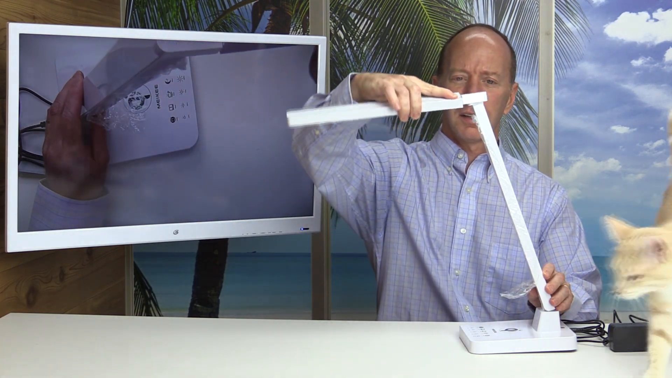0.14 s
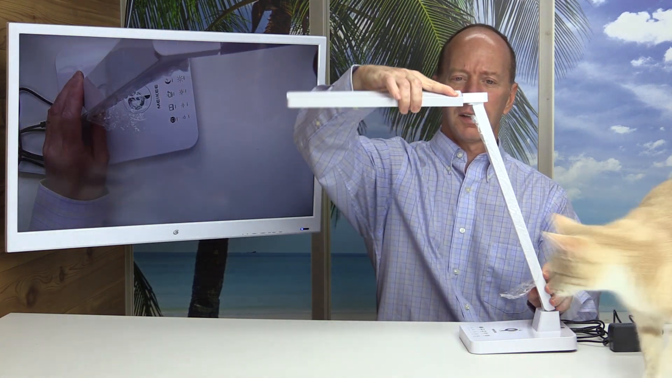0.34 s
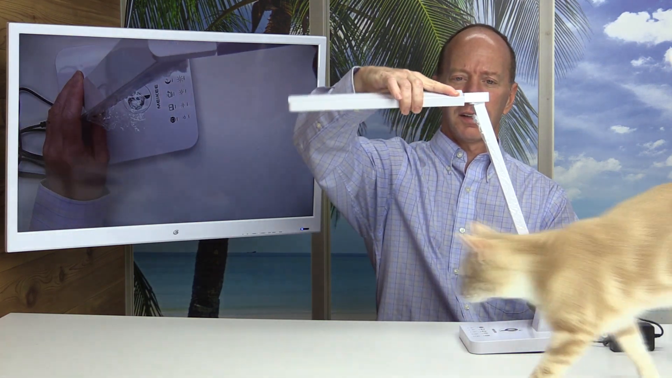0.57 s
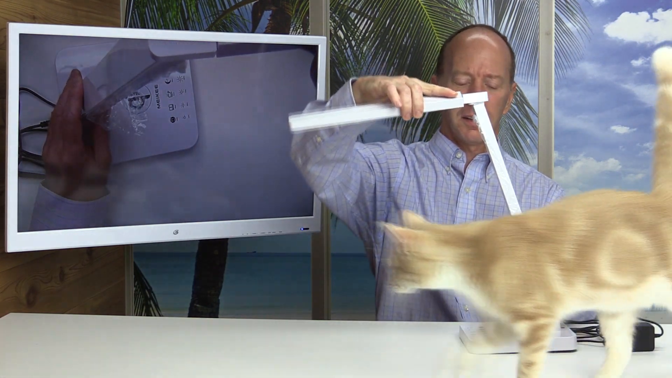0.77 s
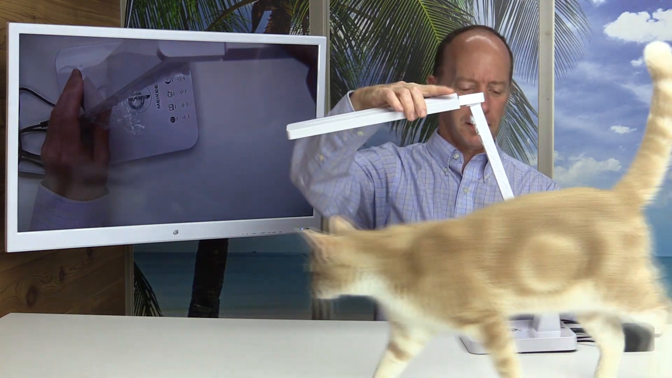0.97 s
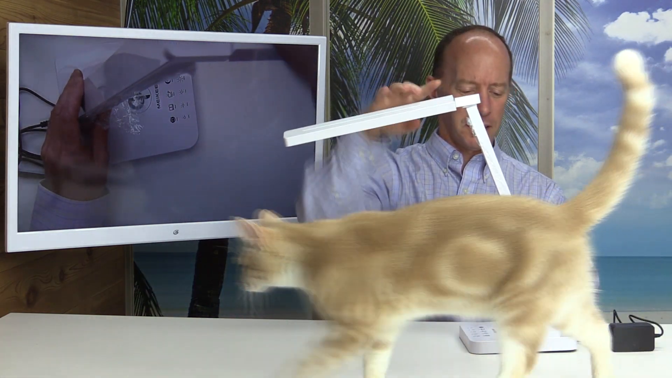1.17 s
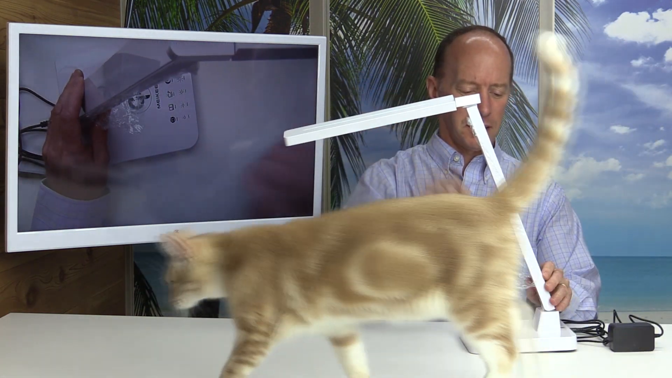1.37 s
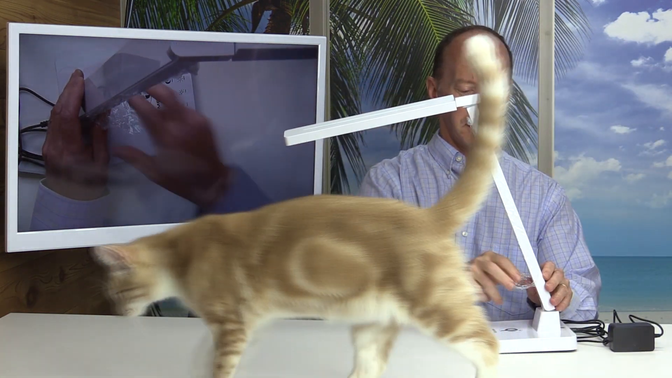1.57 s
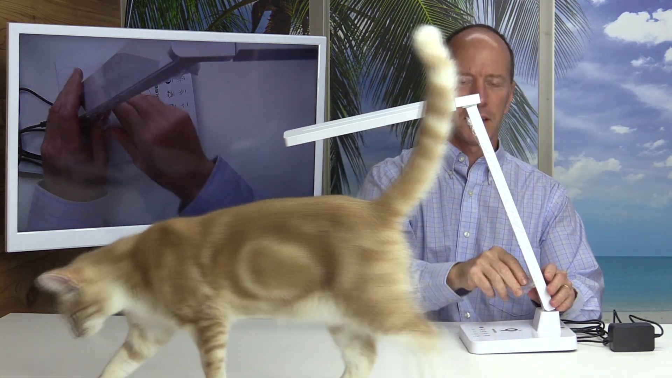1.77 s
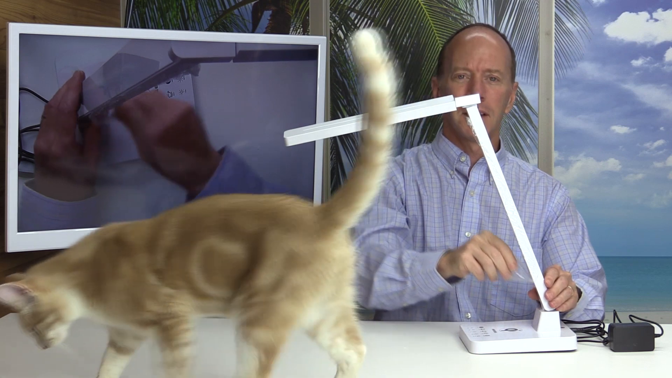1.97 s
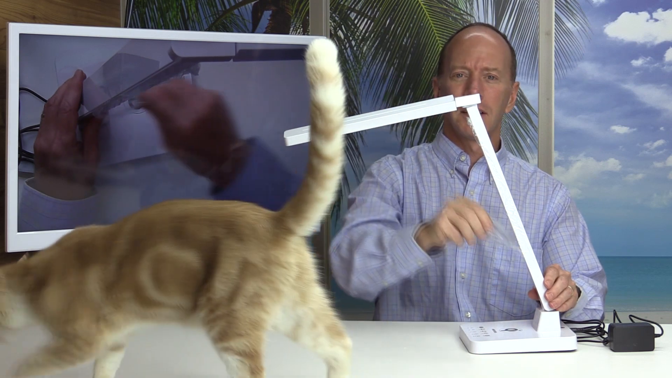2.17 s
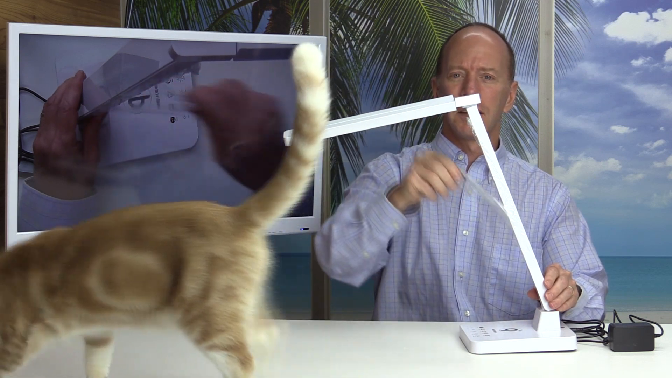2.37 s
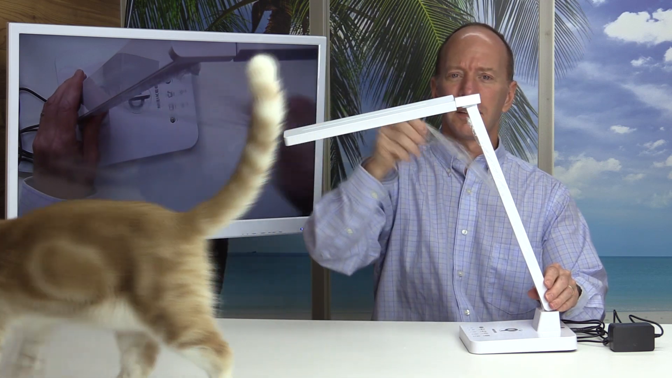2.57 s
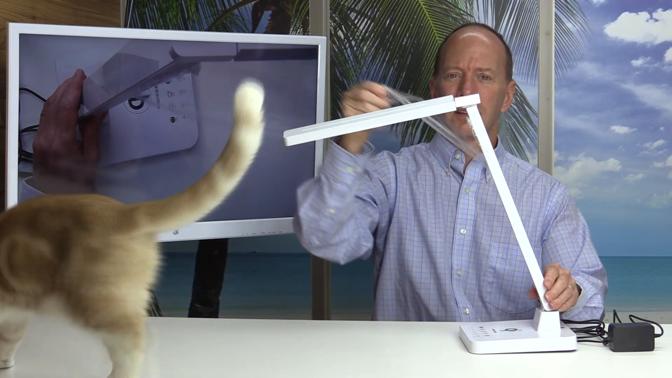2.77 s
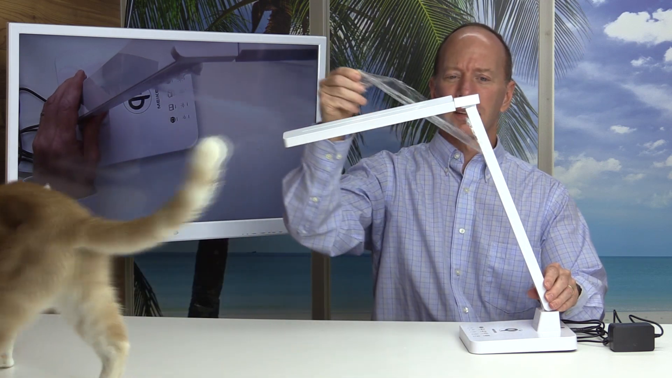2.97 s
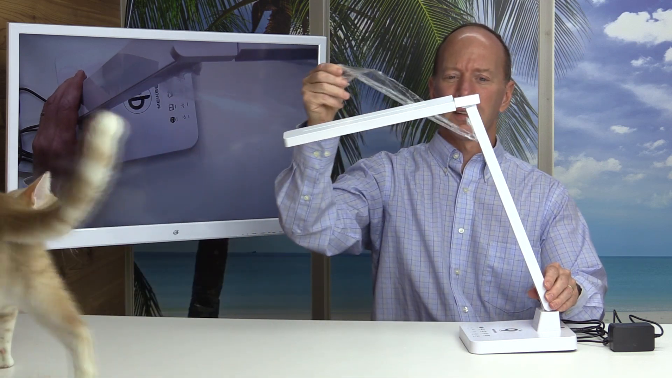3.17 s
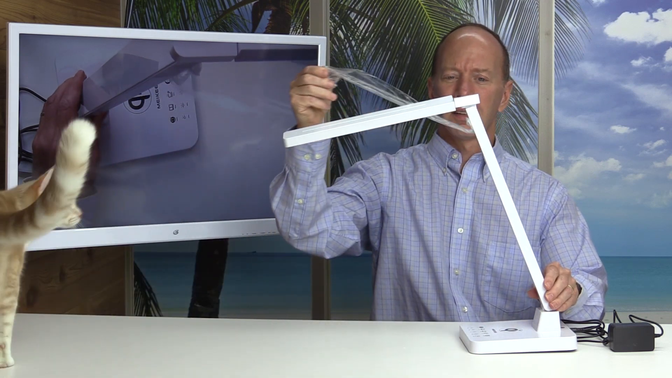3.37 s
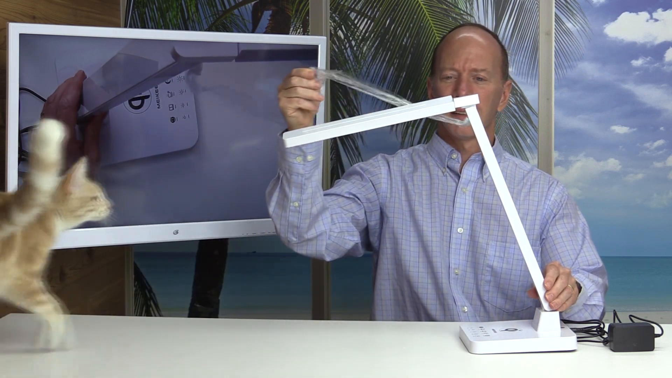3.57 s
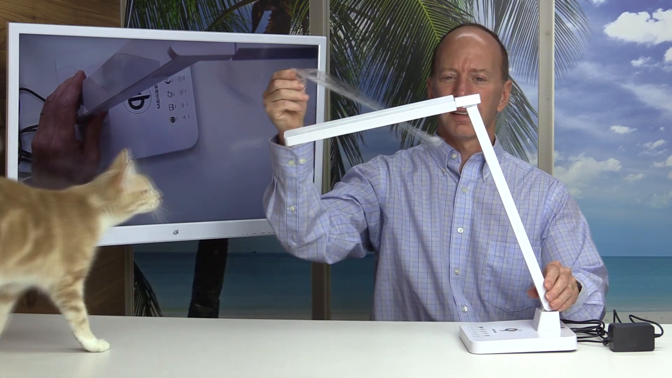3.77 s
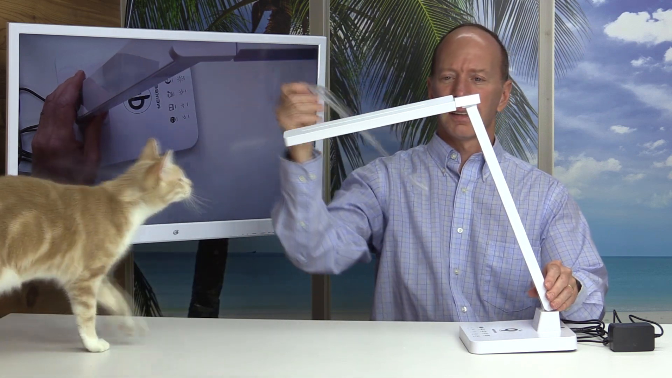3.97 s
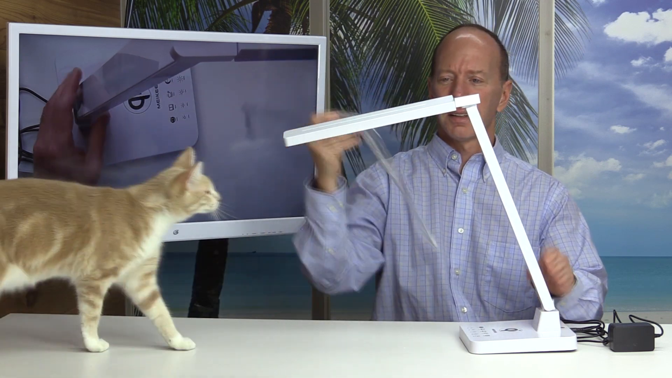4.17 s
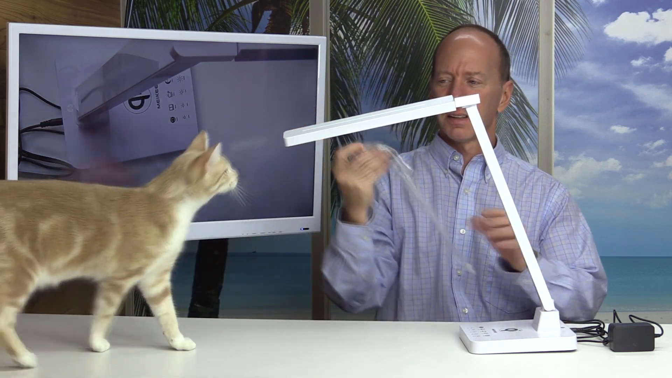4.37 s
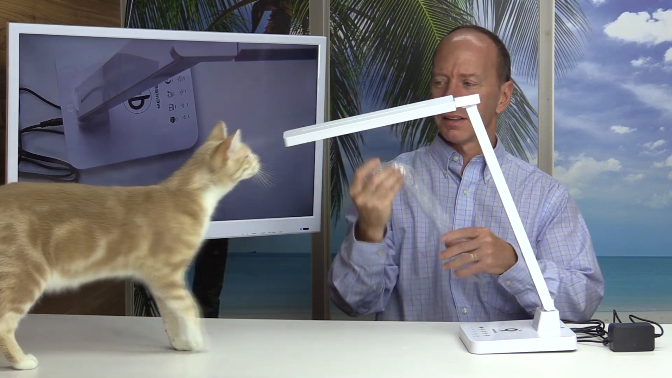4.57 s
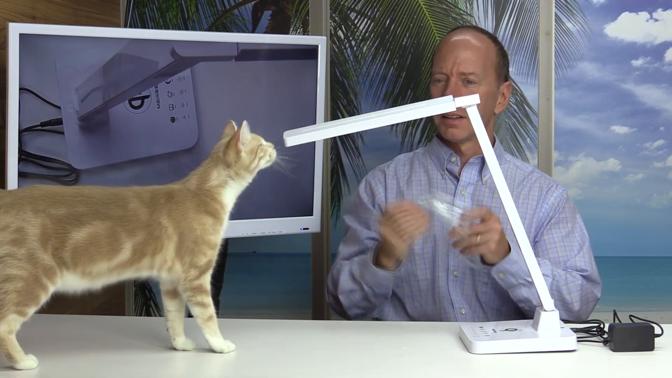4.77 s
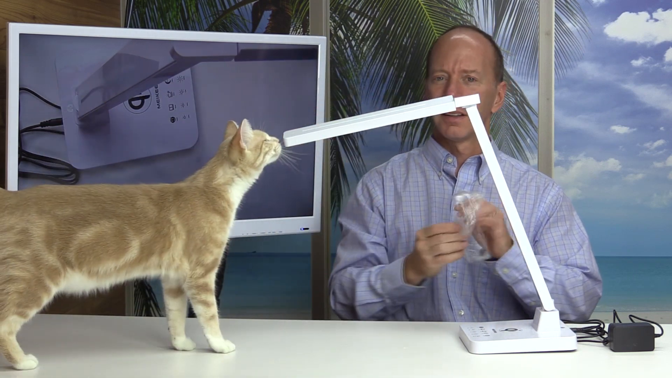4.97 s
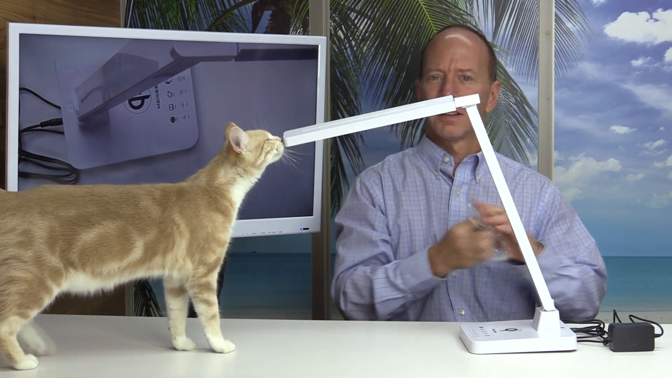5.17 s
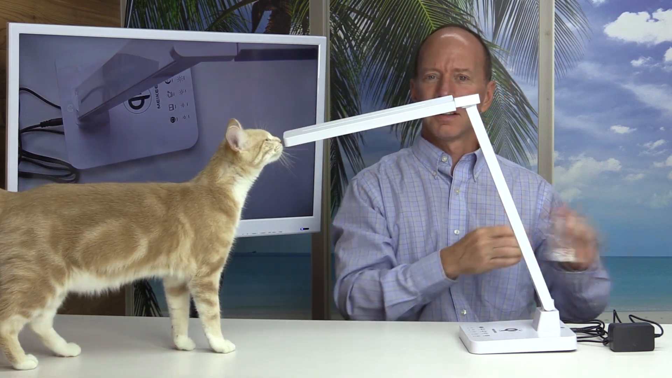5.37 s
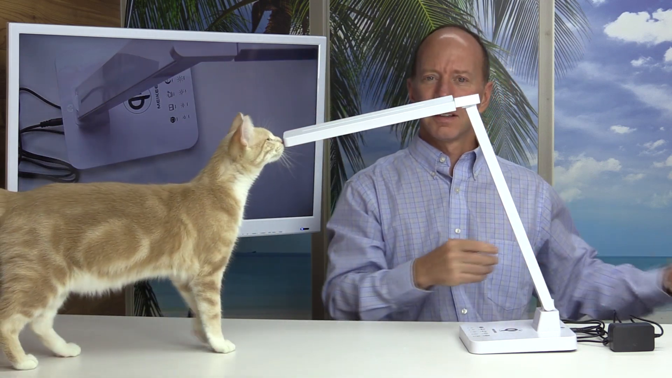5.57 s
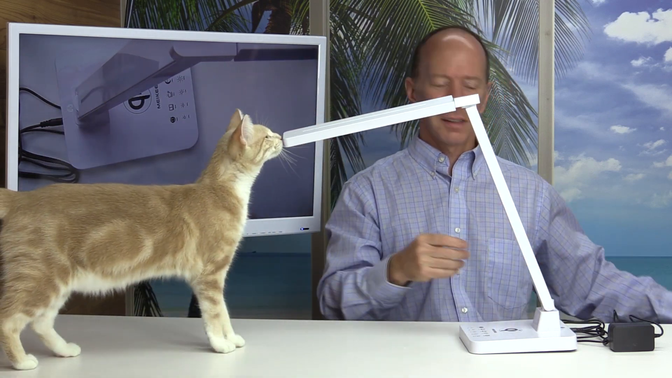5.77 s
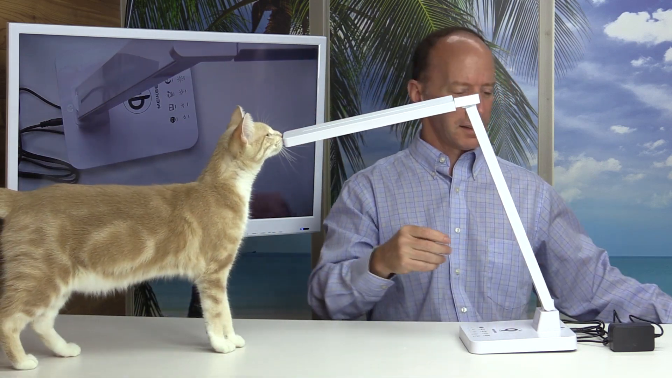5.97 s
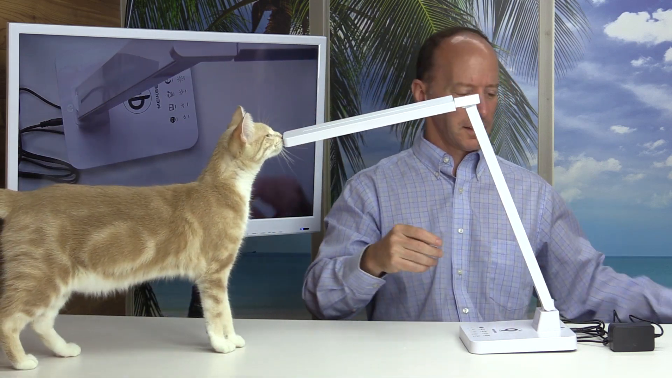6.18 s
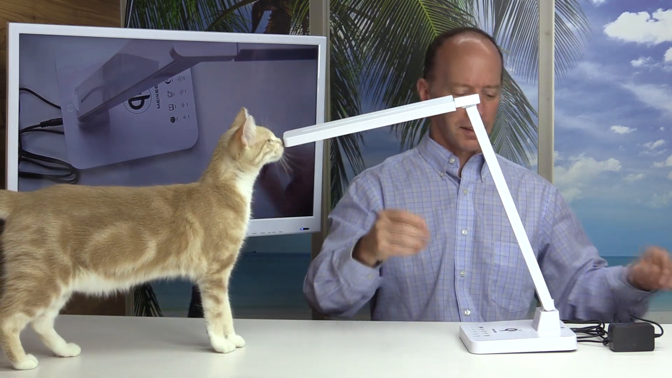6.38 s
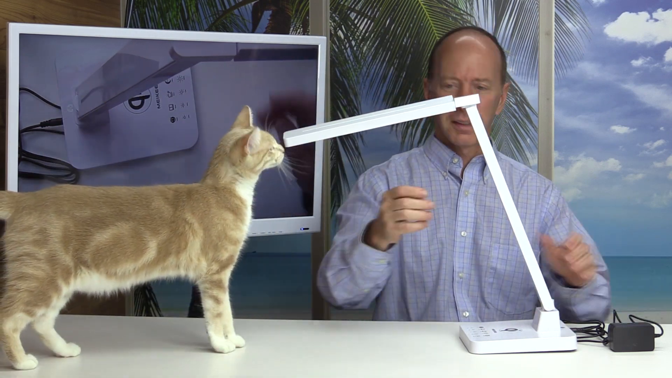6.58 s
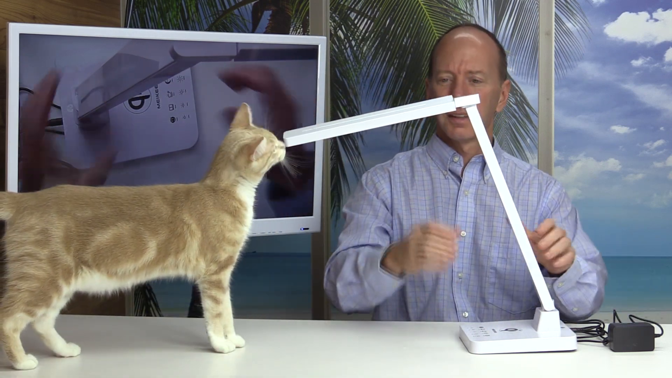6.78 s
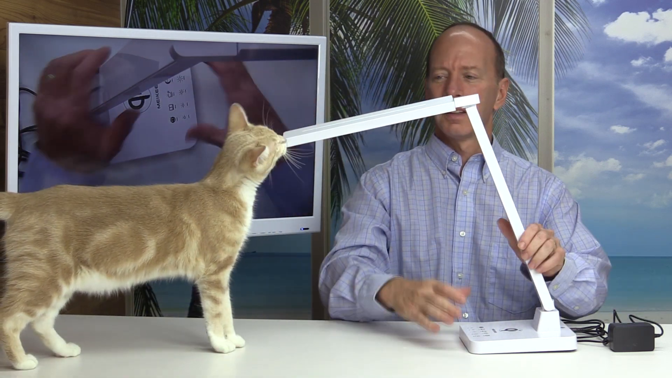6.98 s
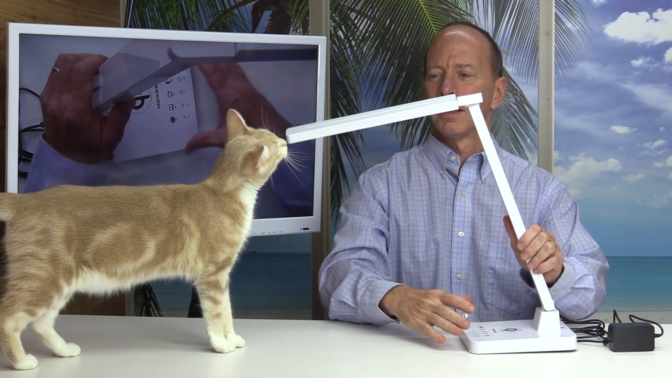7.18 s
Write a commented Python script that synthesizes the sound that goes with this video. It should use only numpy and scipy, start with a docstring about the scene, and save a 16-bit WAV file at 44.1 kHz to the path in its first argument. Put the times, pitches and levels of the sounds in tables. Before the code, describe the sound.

Protective film is pulled off a lamp on a desk. Sparse light clicks and faint squeaks come first, then a forceful crackling tear with drumming flutter and low thumps from the swaying stand. After a quieter stretch of loose crinkling, the film is crumpled in crisp bursts, fading to a dull tap and scattered ticks. Close, nearly centred sound, short room reflections, faint hum.

```python
"""Thin plastic film is peeled off a desk lamp, torn free, crumpled and laid aside in a small room.
Over faint hum and hiss: weak snaps, two hinge squeaks (shaken tones) and a soft knock (damped modes).
From 2 s the pull: sharp snaps (short pings) over dense crackle (thousands of tiny pings), the sheet
flutters (shaped noise), the desk rumbles and the stand sways. The film comes off near 3.75 s, is crumpled
to about 6 s and laid aside with a second knock and last snaps. Both channels are nearly the same."""
import sys
import numpy as np
from scipy import signal
from scipy.fft import rfft, irfft, next_fast_len
from scipy.io import wavfile
from scipy.ndimage import uniform_filter1d, map_coordinates

SR = 44100
rng = np.random.default_rng(int(sys.argv[2]) if len(sys.argv) > 2 else 0)


def unload_audio(sound):
    """Save the sound as a 16-bit wav file, at the path given as the first command line argument."""
    columns = np.transpose(np.atleast_2d(sound))
    # keep every value between -1 and 1, then stretch to whole-number steps
    steps = np.round(np.clip(columns, -1, 1) * 32767)
    wavfile.write(sys.argv[1], SR, steps.astype(np.int16))


N = 319284

# handling of the film: (time [s], crackle level [dB], treble gain, limited to -10..9 [dB], flutter level [dB])
HANDLING = [(0.0, -87.5, -20, -71), (0.62, -93, 30, -78), (0.7, -63.5, -17, -72), (1.2, -69.5, -3, -77),
            (1.62, -74.5, -6.5, -78), (1.69, -46.5, -7, -57), (1.77, -52.5, -5.5, -65),
            (1.85, -41.5, -4.5, -55), (1.96, -44, 1.5, -65), (2.04, -38, 0, -48), (2.2, -37, 6.5, -41),
            (2.36, -37, 2.5, -40.5), (2.66, -32.5, -1.5, -42.5), (2.71, -39, -3, -41.5),
            (2.8, -35.5, -2.5, -43), (2.98, -35.5, -5, -46), (3.27, -48, -7.5, -66.5),
            (3.53, -40, -0.5, -55), (3.76, -57, -38, -69), (3.97, -62, -0.5, -73), (4.32, -56, -3.5, -67),
            (4.64, -57.5, -6, -65), (4.76, -49.5, -2.5, -52.5), (4.98, -40, 0, -54), (5.04, -46.5, -9, -61),
            (5.1, -40.5, -3.5, -50.5), (5.4, -34, -6, -56), (5.56, -51.5, 7.5, -67), (5.68, -38.5, -5, -71),
            (6.0, -51, 0, -58.5), (6.18, -54.5, -6, -65), (6.24, -49.5, -3.5, -61), (6.31, -76, -6, -82),
            (6.43, -57, -1, -63.5), (6.98, -68.5, -3.5, -73), (7.06, -72.5, -2, -75),
            (7.24, -64.5, -35.5, -69)]
# short rips, many creases at once: (time [s], crackle level [dB], flutter level [dB], 60 dB decay [s])
RIP_EVENTS = [(1.656, -52, -48, 0.031), (1.808, -63, -43, 0.04), (1.996, -26, -51, 0.11),
              (2.151, -44, -58, 0.1), (2.773, -70.5, -40, 0.28), (2.905, -19.5, -50, 0.011),
              (3.123, -30.5, -44.5, 0.31), (3.654, -22.5, -37.5, 0.071), (4.329, -36.5, -75, 0.08),
              (4.655, -47, -81, 0.32), (4.722, -30.5, -44.5, 0.14), (4.789, -35, -48, 0.15),
              (4.989, -35, -41.5, 0.11), (5.068, -30.5, -52, 0.13), (5.205, -33.5, -45, 0.12),
              (5.269, -33, -52, 0.09), (5.387, -27.5, -46, 0.078), (5.677, -42, -48, 0.21),
              (6.205, -53, -67.5, 0.32), (6.359, -52, -82, 0.1), (6.421, -46, -71, 0.064),
              (6.617, -53, -78, 0.074), (7.045, -51.5, -84, 0.29)]


def amp(db):
    """Gain of a level in dB."""
    return 10 ** (np.asarray(db) / 20)


def unit(x):
    """x at rms 1."""
    return x / np.sqrt(np.mean(x ** 2) + 1e-20)


def along(points, hz):
    """(Hz, value) points interpolated on a log frequency axis."""
    point_hz, value = np.transpose(points)
    return np.interp(np.log(hz + 1), np.log(point_hz + 1), value)


def curves(rows):
    """One value per sample for each column after the time."""
    time_s, *columns = np.transpose(rows)
    return [np.interp(np.arange(N) / SR, time_s, column) for column in columns]


def wobble(rate_hz):
    """Smooth random curve with rate_hz knots a second."""
    knots = rng.standard_normal(int(N * rate_hz / SR) + 4)
    return map_coordinates(knots, [np.arange(N) * rate_hz / SR])


def filtered(x, response):
    """x times a response of frequency, zero-padded against wrap-around."""
    size = next_fast_len(N + SR // 2)
    return irfft(rfft(x, size) * response(np.fft.rfftfreq(size, 1 / SR)), size)[..., :N]


def coloured(x, spectrum, lo_hz, hi_hz):
    """x given a spectrum, at rms 1 inside the band lo-hi."""
    y = filtered(x, lambda hz: amp(along(spectrum, hz)))
    return y / np.std(filtered(y, lambda hz: (hz > lo_hz) & (hz < hi_hz)))


def pings(time_s, hz, gain, cycles, size):
    """Critically damped sines: the envelope peaks after the given cycles, then decays."""
    turns = np.arange(size) * hz[:, None] / SR
    envelope = turns / cycles * np.exp(1 - turns / cycles)
    shape = gain[:, None] * np.sin(2 * np.pi * turns) * envelope
    at = np.round(time_s * SR).astype(int)[:, None] + np.arange(size)
    return np.bincount(at.ravel(), shape.ravel(), N + size + SR)[:N]


def bursts(time_s, db, t60_s):
    """Envelope of sudden swells: 2 ms rise, 60 dB decay in t60_s."""
    out, t = np.zeros(N + SR), np.arange(SR // 2) / SR
    for start_s, level_db, decay_s in zip(time_s, db, t60_s):
        swell = amp(level_db - 60 * t / decay_s) * (1 - np.exp(-t / 0.002))
        out[round(start_s * SR):][:len(t)] += swell
    return out[:N]


def background():
    """Mains hum with slightly unsteady lines, and the steady hiss of room and amplifier."""
    # hum lines: (frequency [Hz], typical rms level [dB])
    hum_lines = [(59.2, -55), (172.3, -69.5)]
    # hiss spectrum: (frequency [Hz], relative density [dB per Hz])
    hiss_spectrum = [(60, -24), (100, 12.5), (150, -9.5), (185, 7.5), (260, -1.5), (500, -8), (1240, -21.5),
                     (3070, -27.5), (16000, -65.5)]
    hiss_db = -68
    t, hum = np.arange(N) / SR, np.zeros(N)
    for hz, db in hum_lines:
        level = np.sqrt(2) * amp(db + 1.6 * wobble(14))
        hum += level * np.sin(2 * np.pi * hz * t + wobble(4))
    return hum + amp(hiss_db) * coloured(rng.standard_normal(N), hiss_spectrum, 152, 15500)


def desk_rumble():
    """Handling shakes desk and stand: two bands of low noise that follow the pulling."""
    # shaking: (time [s], deep level [dB], upper level [dB])
    shaking = [(0.0, -48, -61), (0.24, -47.5, -67), (1.13, -54, -63.5), (1.95, -53, -74), (2.02, -73, -53),
               (2.52, -55, -48.5), (3.0, -42.5, -43), (3.21, -37, -43.5), (3.25, -50, -56.5),
               (3.63, -36, -48), (3.85, -57.5, -65), (6.11, -62, -69), (7.24, -72, -66.5)]
    # deep spectrum: (frequency [Hz], relative density [dB per Hz])
    deep_spectrum = [(12, -3), (22, 7), (40, 0.5), (60, -13.5), (90, -44)]
    # upper spectrum: (frequency [Hz], relative density [dB per Hz])
    upper_spectrum = [(45, -2.5), (70, 7), (110, -3), (170, -5.5), (260, -62)]
    deep_db, upper_db = curves(shaking)
    deep = amp(deep_db) * coloured(rng.standard_normal(N), deep_spectrum, 18, 50)
    return deep + amp(upper_db) * coloured(rng.standard_normal(N), upper_spectrum, 75, 150)


def stand_sway():
    """Tugs set the lamp stand swaying: heavily damped low swings."""
    # tugs: (time [s], envelope peak [dB], sway frequency [Hz])
    tugs = [(2.798, -31.5, 34), (2.872, -28, 45), (3.061, -33.5, 32), (3.143, -24, 30.3),
            (3.292, -28, 31.7), (3.532, -25.5, 17.9)]
    time_s, tug_db, sway_hz = np.transpose(tugs)
    return pings(time_s, sway_hz, amp(tug_db), cycles=0.89, size=20000)


def desk_knocks():
    """Soft knocks ring the modes of the desk top, with a low thud and a noisy puff."""
    # knocks: (time [s], ring level [dB], thud level [dB], puff level [dB])
    knocks = [(0.98, -70, -50, -56), (6.487, -45, -43, -45)]
    # desk modes: (frequency [Hz], bandwidth [Hz], gain on the ring level [dB])
    modes = [(503, 150, 8), (726, 38, 1.5), (1037, 25, -4)]
    # puff spectrum: (frequency [Hz], relative density [dB per Hz])
    puff_spectrum = [(90, -35), (180, 3), (450, 9), (900, -7), (1800, -26), (4000, -50)]
    time_s, ring_db, thud_db, puff_db = np.transpose(knocks)
    same = np.ones(len(time_s))
    out = pings(time_s, 115 * same, amp(thud_db), cycles=0.76, size=6000)
    for hz, width_hz, mode_db in modes:
        # a narrow mode rings for more cycles
        out += pings(time_s, hz * same, amp(ring_db + mode_db), cycles=0.14 * hz / width_hz, size=4000)
    puff = coloured(rng.standard_normal(N), puff_spectrum, 220, 900)
    return out + bursts(time_s, puff_db, 0.18 * same) * puff


def flutter():
    """The stretched sheet drums low and unevenly, deeper as the freed strip grows."""
    # short-strip spectrum: (frequency [Hz], relative density [dB per Hz])
    short_spectrum = [(76, -49), (130, -5.5), (209, -1.5), (544, 6), (614, 3), (835, 3), (1200, -1.5),
                      (1560, 0.5), (2640, -120)]
    peel_s, free_s, off_s = 2.08, 3.04, 3.75  # pull starts, strip at full length, strip comes off
    slack_ratio = 0.46  # pitch of the long strip over the short one
    long_spectrum = [(hz * slack_ratio, db) for hz, db in short_spectrum]
    uneven = rng.standard_normal((2, N)) * amp(2 * wobble(90))
    short = coloured(uneven[0], short_spectrum, 220, 900)
    long = coloured(uneven[1], long_spectrum, 220, 900)
    freed = np.interp(np.arange(N) / SR, [peel_s, free_s, off_s, off_s + 0.14], [0, 1, 1, 0])
    start_s, _, rip_db, t60_s = np.transpose(RIP_EVENTS)
    level = amp(curves(HANDLING)[2]) + bursts(start_s, rip_db, t60_s)
    return level * (np.sqrt(1 - freed) * short + np.sqrt(freed) * long)


def hinge():
    """Short rough squeaks of the lamp hinge: a tone whose phase is shaken by fast random motion."""
    # squeaks: (time [s], length [s], peak level before the room [dB], pitch [Hz])
    squeaks = [(0.888, 0.052, -63, 2450), (1.046, 0.03, -65, 2430)]
    deviation_hz = 160
    t, out = np.arange(N) / SR, np.zeros(N)
    shaken = 2 * np.pi * deviation_hz * np.cumsum(wobble(400)) / SR
    for start_s, length_s, db, hz in squeaks:
        envelope = np.sin(np.pi * np.clip((t - start_s) / length_s, 0, 1)) ** .5
        out += amp(db) * envelope * np.sin(2 * np.pi * hz * t + shaken)
    return out


def creases(count=150):
    """Clear snaps, plus lesser ones at random times that follow the handling and the rips."""
    # clear creases: (time [s], nominal peak [dB], pitch [Hz], dull pop relative to the peak [dB])
    clear = [(0.0347, -45, 3730, -5.0), (0.1276, -48.5, 1820, 0.0), (0.3089, -42.0, 7550, -18.0),
             (0.6129, -47, 1600, -3.0), (0.6526, -44, 3540, -11.0), (0.662, -44, 1500, -2),
             (0.6744, -39.0, 4040, -5.0), (0.6975, -40.5, 6950, -17.0), (0.7279, -33, 6000, -9.0),
             (0.7528, -35, 2940, -7.0), (0.792, -45, 2200, -6), (0.8200, -41, 7000, -10),
             (0.843, -42, 3500, -14), (0.8523, -29.0, 6890, -23.0), (0.9649, -36.0, 7650, -25.0),
             (1.0087, -29.5, 7140, -15.0), (1.0764, -34.5, 6620, -16.0), (1.1135, -42.5, 9900, -21.0),
             (1.1609, -34, 6350, -25.0), (1.1685, -25, 7490, -17.0), (1.18, -34.5, 6130, -18.0),
             (1.204, -42, 3500, -10), (1.3199, -39.5, 5070, -13.0), (1.4455, -37.5, 4190, -14.0),
             (1.657, -34.0, 6250, -9.0), (1.6803, -32, 6970, -15.0), (1.8104, -29, 7320, -15.0),
             (1.9093, -21.5, 8120, -27.0), (2.0351, -17, 5020, -14.0), (2.1455, -15, 6690, -20.0),
             (2.178, -14, 9320, -17), (2.2026, -13.0, 7360, -25.0), (2.214, -16, 6010, -18),
             (2.2699, -12.0, 5290, -19.0), (2.2819, -11, 9110, -22.0), (2.3691, -13, 4940, -15.0),
             (2.4464, -14.0, 9190, -26.0), (2.4651, -13.0, 6510, -21.0), (2.5791, -9.5, 7650, -24.0),
             (2.6109, -8, 6690, -24.0), (2.7662, -14.0, 4690, -15.0), (2.777, -11.5, 7960, -19.0),
             (2.823, -14.0, 7580, -21.0), (2.9071, -11.5, 5110, -13.0), (2.9293, -11.0, 5230, -17.0),
             (2.9745, -16.0, 5540, -21.0), (3.0016, -12.5, 4290, -13.0), (3.0616, -16.0, 5690, -17.0),
             (3.07, -16.0, 6240, -19.0), (3.0854, -17.0, 6770, -22.0), (3.1317, -14, 2600, -8.0),
             (3.1479, -12.5, 8430, -22.0), (3.1975, -14.5, 3750, -12.0), (3.2148, -25, 6430, -15.0),
             (3.2222, -25, 3700, -11), (3.2528, -23, 3400, -12.0), (3.2627, -22.5, 4360, -17.0),
             (3.2878, -26.5, 5410, -17.0), (3.2999, -11.5, 6700, -25.0), (3.3309, -10, 5670, -33.0),
             (3.3604, -17.5, 5840, -20.0), (3.4095, -17, 2780, -11.0), (3.4158, -15.0, 8850, -27.0),
             (3.4387, -16, 3980, -22), (3.4431, -17.5, 7360, -23.0), (3.459, -10.0, 5830, -23.0),
             (3.483, -23, 2590, -8.0), (3.4976, -17.0, 5640, -21.0), (3.5161, -20, 7110, -20.0),
             (3.5269, -17, 5000, -17.0), (3.5371, -18.5, 5240, -21.0), (3.55, -20, 2200, -13.0),
             (3.5788, -21.0, 5210, -20.0), (3.5941, -21, 7140, -21.0), (3.615, -21, 3020, -9),
             (3.6512, -18, 6150, -22.0), (3.6591, -13.5, 4790, -19.0), (3.665, -14, 9360, -13),
             (3.6831, -13.0, 3480, -12.0), (3.7389, -28, 8100, -26.0), (3.7539, -22.5, 7620, -21.0),
             (3.8209, -27, 6000, -14.0), (3.8415, -34, 7350, -13.0), (3.8505, -19.5, 9320, -32.0),
             (3.8657, -29, 6460, -28.0), (3.929, -33, 6000, -12), (3.935, -29.0, 5110, -21.0),
             (3.9482, -33, 7070, -22.0), (4.002, -30, 6000, -14), (4.0091, -30.5, 6110, -15.0),
             (4.0274, -35.5, 2840, -7.0), (4.0351, -30.5, 5910, -15.0), (4.0547, -23.5, 5610, -14.0),
             (4.0718, -32, 6700, -13.0), (4.0916, -31.5, 6650, -23.0), (4.1685, -32.5, 6160, -26.0),
             (4.189, -36, 2220, -15), (4.2046, -32.0, 5340, -18.0), (4.2331, -21.0, 8550, -26.0),
             (4.238, -28, 8000, -22), (4.243, -25.5, 7270, -23.0), (4.278, -22.5, 6270, -14.0),
             (4.3086, -30, 4170, -16.0), (4.3287, -25.0, 7450, -17.0), (4.345, -29, 6210, -16),
             (4.3968, -19.5, 5690, -21.0), (4.4175, -29, 6900, -25.0), (4.4318, -20.5, 7140, -27.0),
             (4.4768, -25.5, 7160, -24.0), (4.5112, -29.5, 6620, -17.0), (4.56, -36, 5440, -15),
             (4.5957, -35.5, 4210, -19.0), (4.6303, -31.5, 5690, -19.0), (4.6554, -23.0, 7400, -25.0),
             (4.6652, -27.5, 6110, -16.0), (4.6878, -29, 2550, -10), (4.7124, -25, 5750, -17),
             (4.7269, -17, 2960, -14), (4.7325, -16.5, 6520, -17.0), (4.7549, -13.0, 9300, -24.0),
             (4.7916, -17.5, 4930, -13.0), (4.8137, -20, 8100, -14), (4.8551, -22, 5600, -17.0),
             (4.9055, -20.0, 7150, -23.0), (4.9191, -19.0, 5900, -18.0), (4.9873, -15.0, 7780, -21.0),
             (5.2108, -18.0, 2840, -6.0), (5.2689, -17, 7880, -14.0), (5.2912, -12.5, 7940, -24.0),
             (5.32, -14, 8420, -21), (5.3379, -11, 7480, -23.0), (5.3592, -17, 6650, -20.0),
             (5.3858, -12.5, 6280, -21.0), (5.395, -17, 4170, -13), (5.4451, -16, 5940, -19),
             (5.4629, -14.5, 7150, -19.0), (5.4925, -24, 4340, -12), (5.5871, -21.5, 6060, -24.0),
             (5.7755, -21.5, 7360, -23.0), (5.8055, -23.5, 3640, -14.0), (5.8678, -29, 2250, -12),
             (5.9355, -26.0, 7980, -16.0), (6.0873, -29.5, 4470, -10.0), (6.2082, -35, 6410, -14.0),
             (6.2233, -27.5, 4340, -14.0), (6.3574, -32, 6690, -19.0), (6.379, -41, 4820, -9),
             (6.4205, -32, 4380, -10.0), (6.435, -31, 8730, -19), (6.4482, -29.0, 9620, -20.0),
             (6.4879, -36.5, 2540, -6.0), (6.567, -42, 2600, -12), (6.5795, -40.0, 8080, -12.0),
             (6.6157, -28, 7980, -24.0), (6.6544, -36, 6620, -20), (6.6954, -36.0, 6430, -13.0),
             (6.7624, -34.0, 6380, -21.0), (6.7746, -36.5, 6200, -15.0), (7.0418, -24, 5820, -30.0),
             (7.0456, -23.5, 7140, -28.0), (7.0502, -27, 7000, -28), (7.0776, -25.0, 8930, -24.0)]
    rip_share = 0.4  # how far lesser creases grow with a rip
    over_db, spread_db = 8, 1.5  # base level over the crackle, scale of the random excess
    middle_hz, spread_octaves, pop_db = 6200, 1, -9.5
    when, luck = rng.random((count, 2)).T
    start_s, rip_db, _, t60_s = np.transpose(RIP_EVENTS)
    effort = amp(curves(HANDLING)[0]) + rip_share * bursts(start_s, rip_db, t60_s)
    busy = np.cumsum(effort ** .4)  # harder handling folds more creases
    at = np.searchsorted(busy, when * busy[-1])
    db = 20 * np.log10(effort[at]) + over_db - spread_db * np.log(luck + 0.052)
    hz = np.clip(middle_hz * 2 ** (spread_octaves * rng.standard_normal(count)), SR / 30, SR / 3)
    lesser = [at / SR, db, hz, np.full(count, pop_db)]
    return np.concatenate([np.transpose(clear), lesser], axis=1)


def patchy(x, depth_db):
    """x under random gain patches, each about 1.7 kHz by 0.04 s."""
    z = signal.stft(x, nperseg=256)[2]
    field = uniform_filter1d(rng.standard_normal(z.shape), size=10, axis=0)
    field = uniform_filter1d(field, size=14, axis=1)
    return signal.istft(z * amp(depth_db * unit(field)), nperseg=256)[1][:N]


def aftershocks(time_s, db, t60_s):
    """Each snap sets off neighbouring creases: a short dying swell in step with its strength."""
    spread_s = .0004  # time to reach the neighbours
    kicks = np.bincount((time_s * SR).astype(int), amp(db), N)
    t = np.arange(SR // 8) / SR
    swell = amp(-60 * t / t60_s) * np.minimum(t / spread_s, 1)
    return np.abs(signal.fftconvolve(kicks, swell)[:N])


def crackle(flips, count=50000):
    """Countless small creases give way: short pings of widely spread size and pitch."""
    # crackle spectrum: (frequency [Hz], relative density [dB per Hz])
    spectrum = [(410, -25), (700, -1.5), (852, -10.5), (1200, -5), (1750, 2.5), (2530, 3), (3240, 3),
                (9350, 4), (14800, -0.5), (16000, -5)]
    patch_db = 1.2  # colour shifts as the sheet changes shape
    tint_hz, tint_db_per_octave = 5850, 2  # snaps above this pitch set off brighter creases
    level_db, treble_db, _ = curves(HANDLING)
    when, pitch, luck, sign = rng.random((count, 4)).T
    size = amp(-3.6 * np.log(luck + .008)) * np.sign(sign - .5)
    grains = pings(when * N / SR, 900 * 17 ** pitch, size, cycles=.6, size=80)
    # flatten the grains' own spectrum, then colour them
    density = signal.welch(grains, SR, nperseg=256)
    white = filtered(grains, lambda hz: np.interp(hz, *density) ** -.5)
    fizz = coloured(patchy(white, patch_db), spectrum, 1500, 15000)
    treble = filtered(fizz, lambda hz: 1 / (1 + (5500 / (hz + 1)) ** 4))

    gentle = np.clip((-44 - level_db) / 20, 0, 1)  # light handling leaves gaps between clumps
    clumps = amp((1.5 + 4.5 * gentle) * wobble(80))
    start_s, rip_db, _, t60_s = np.transpose(RIP_EVENTS)
    effort = amp(level_db) * clumps + bursts(start_s, rip_db, t60_s)

    snap_s, snap_db, snap_hz, _ = flips
    half_tint_db = tint_db_per_octave * np.log2(snap_hz / tint_hz) / 2
    dull = aftershocks(snap_s, snap_db - 9 - half_tint_db, t60_s=0.009)
    bright = aftershocks(snap_s, snap_db - 9 + half_tint_db, t60_s=0.009)
    treble_level = effort * amp(np.clip(treble_db, -10, 9)) + bright
    return (effort + dull) * (fizz - treble) + treble_level * treble


def snaps(flips):
    """A crease flips: a sharp swing at its pitch, a quick rebound, two thin bright edges, a dull pop."""
    swing_db = -2  # first swing relative to the nominal peak
    rebound_db, edge_db, edge_spread_db = -5, -11, 2  # relative to the first swing; scatter of the edges
    pop_hz = 1740  # middle pitch of the pops
    time_s, db, hz, pop_db = flips
    draw = rng.standard_normal((len(time_s), 8))
    peak = amp(db + swing_db) * np.sign(draw[:, 3])
    heft = np.minimum(hz / 8500, 1) ** .4  # slow swings last longer and so start weaker
    edge = peak * amp(edge_db + edge_spread_db * draw[:, 4:6].T)
    out = pings(time_s, hz, peak * heft, cycles=.42, size=128)
    rebound_s = time_s + .0006 * amp(3 * draw[:, 6])
    rebound_hz = hz * amp(2.5 * draw[:, 7])
    out += pings(rebound_s, rebound_hz, -peak * heft * amp(rebound_db), cycles=.5, size=160)
    out += pings(time_s + .00005, 9000 * amp(1.5 * draw[:, 0]), edge[0], cycles=.6, size=48)
    out += pings(time_s + .0001, 13500 * amp(.6 * draw[:, 1]), edge[1], cycles=.7, size=48)
    pop = pings(time_s, pop_hz * amp(1.87 * draw[:, 2]), peak * amp(pop_db), cycles=0.63, size=192)
    return out + pop


def room(x, tail_db, side_db):
    """Early copies and a diffuse tail, nearly the same in both channels, redrawn so no echo colours the sound."""
    # early copies off desk top and near wall: (delay [s], level [dB])
    early = [(.0036, -11), (.0082, -14)]
    # reverberation: (frequency [Hz], 60 dB decay [s])
    decay = [(300, 0.18), (2000, 0.16), (8000, 0.24), (15000, 0.15)]
    out = np.tile(x, (2, 1))
    step = SR // 18  # redrawn 18 times a second
    for start in range(0, N, step):
        hz, t, z = signal.stft(rng.standard_normal((2, SR // 5)), SR, nperseg=128)
        z = z * amp(-60 * t / along(decay, hz)[:, None])
        mid, side = signal.istft(z, SR, nperseg=128)[1]
        tails = np.array([mid + amp(side_db) * side, mid - amp(side_db) * side])
        tails *= amp(tail_db) / np.linalg.norm(mid)
        tails *= np.minimum(np.arange(len(mid)) / SR / .003, 1)  # no wall answers at once
        for delay_s, db in early:
            tails[:, round(delay_s * SR + rng.normal(0, 7))] += amp(db)
        wet = signal.fftconvolve(x[None, start:start + step], tails, axes=1)
        out[:, start:start + wet.shape[1]] += wet[:, :N - start]
    return out


def scene():
    """Only crackle, snaps and hinge squeaks pass through the room; flutter and low sounds stay dry."""
    flips = creases()
    direct = background() + desk_rumble() + stand_sway() + desk_knocks() + flutter()
    return direct + room(hinge() + crackle(flips) + snaps(flips), tail_db=-6, side_db=-19)


def record(dry):
    """The two channels differ a little in colour; nothing passes above the band limit."""
    # channel difference: (frequency [Hz], left minus right [dB])
    lean = [(60, -1.65), (600, -1.6), (1200, -.4), (3000, -.5), (8500, -.9), (15000, -.4)]
    top_hz = 15800
    halves = np.array([[.5], [-.5]])  # left, right
    return filtered(dry, lambda hz: amp(along(lean, hz) * halves) * (hz < top_hz))


dry = scene()
out = record(dry)
unload_audio(out)
```